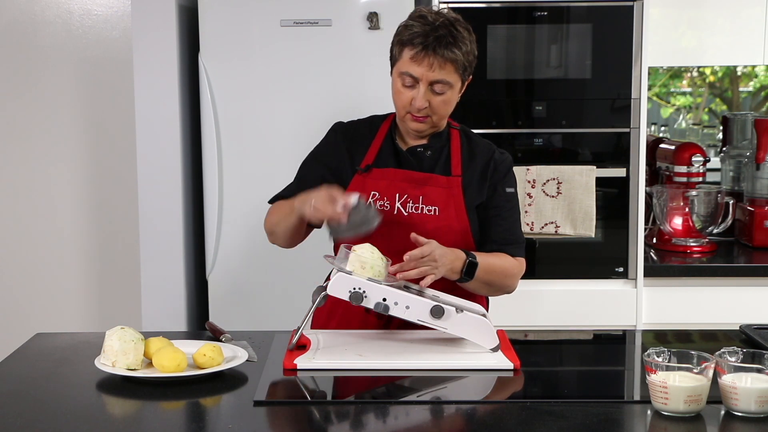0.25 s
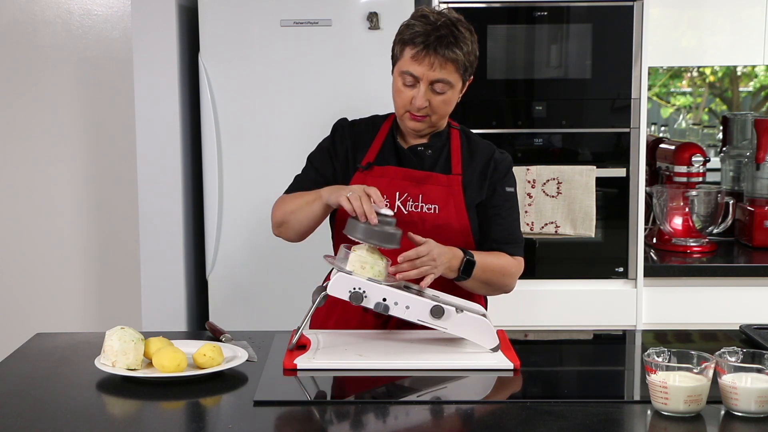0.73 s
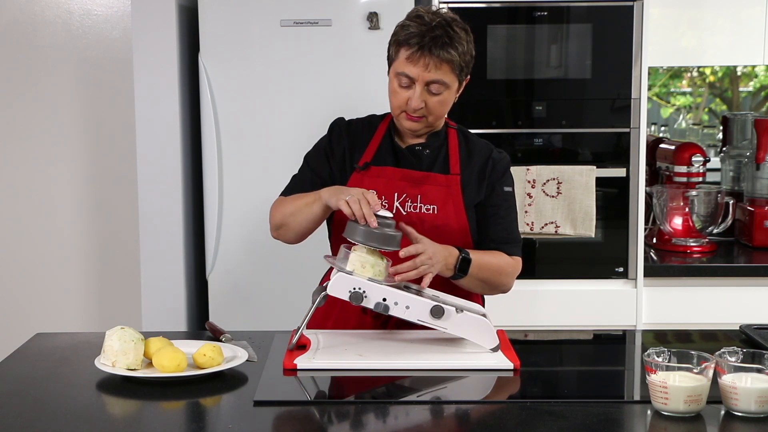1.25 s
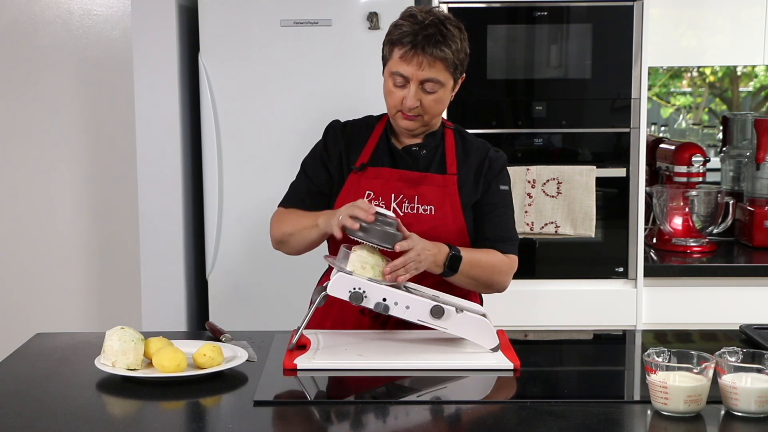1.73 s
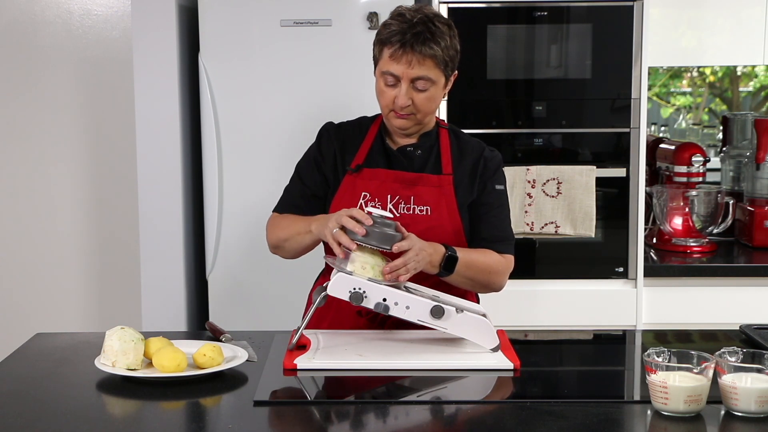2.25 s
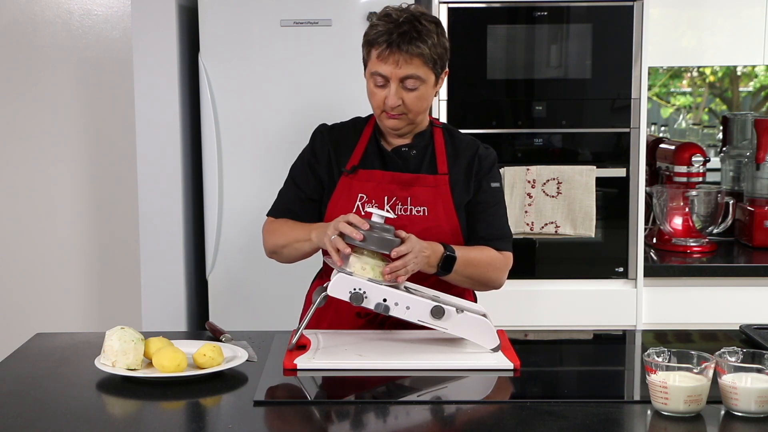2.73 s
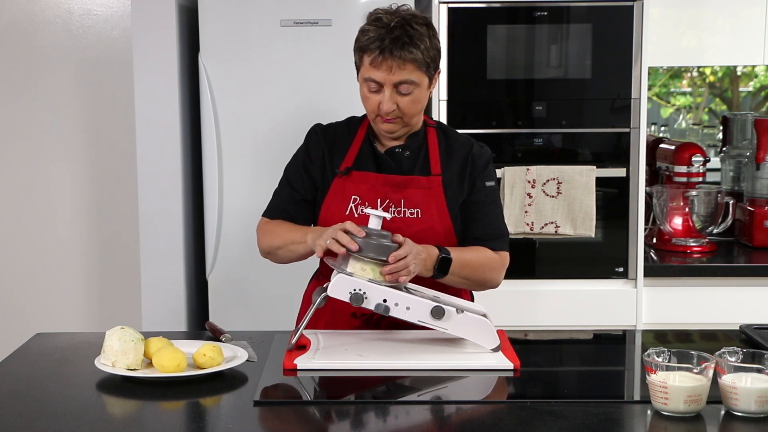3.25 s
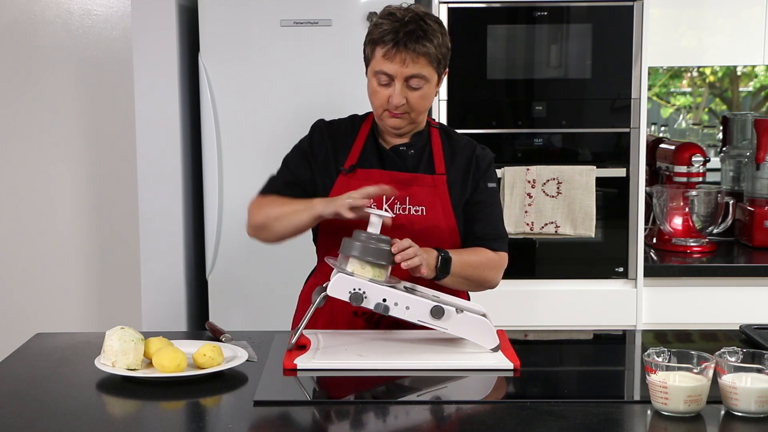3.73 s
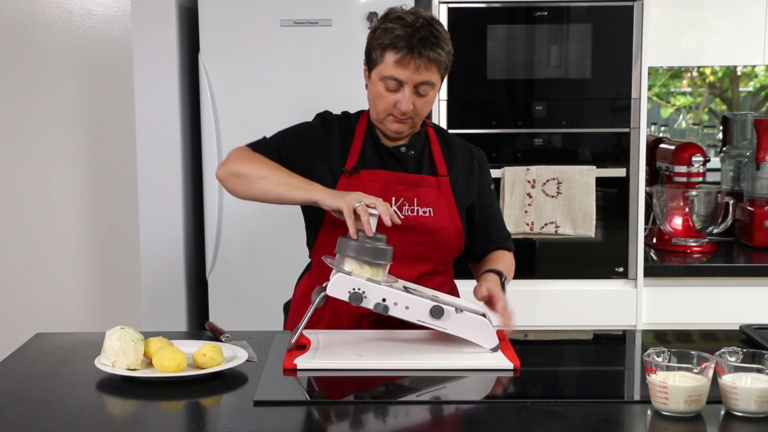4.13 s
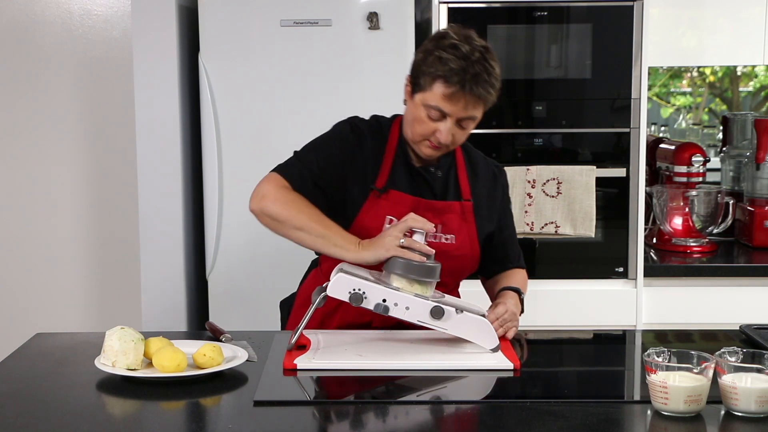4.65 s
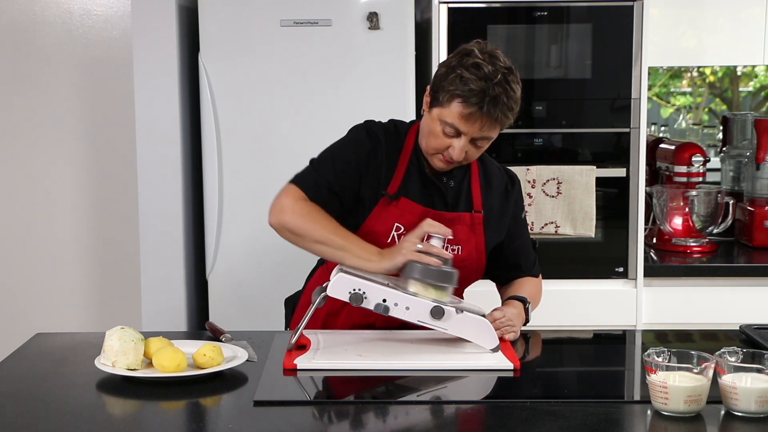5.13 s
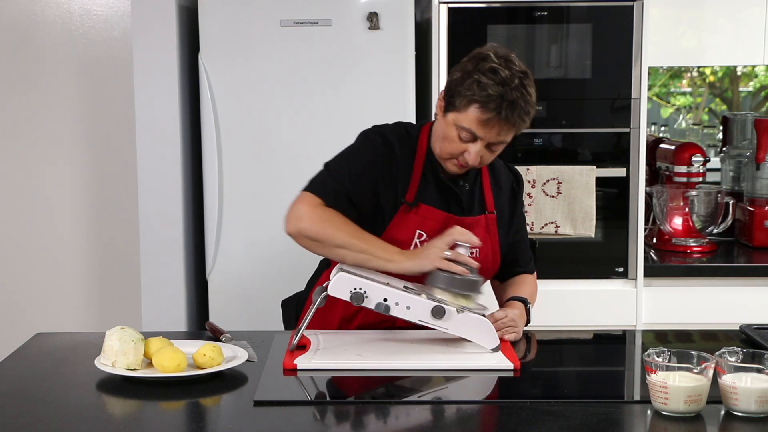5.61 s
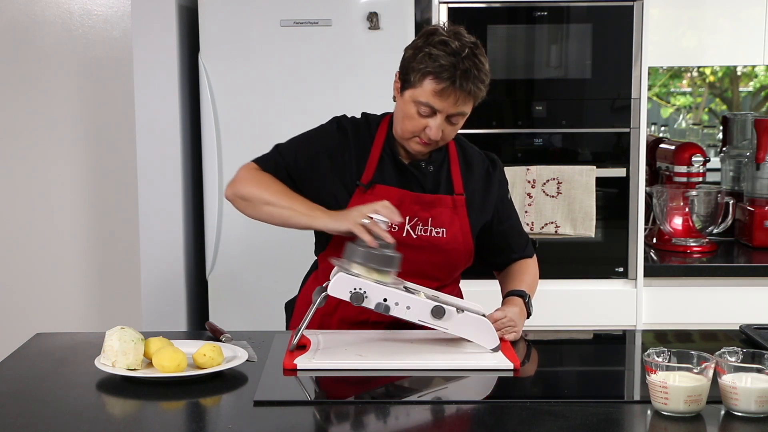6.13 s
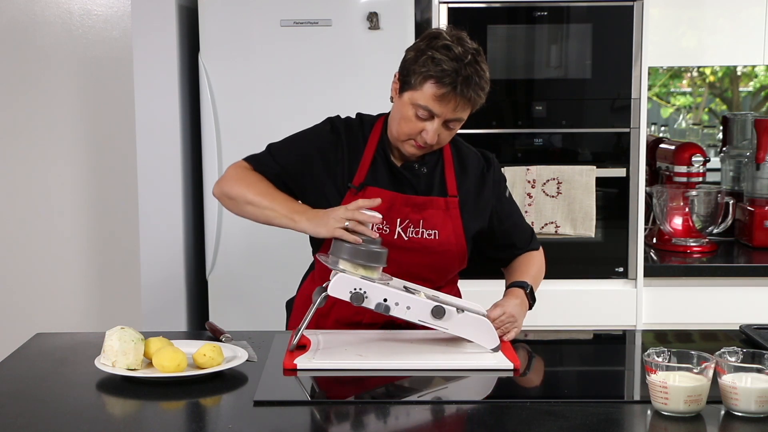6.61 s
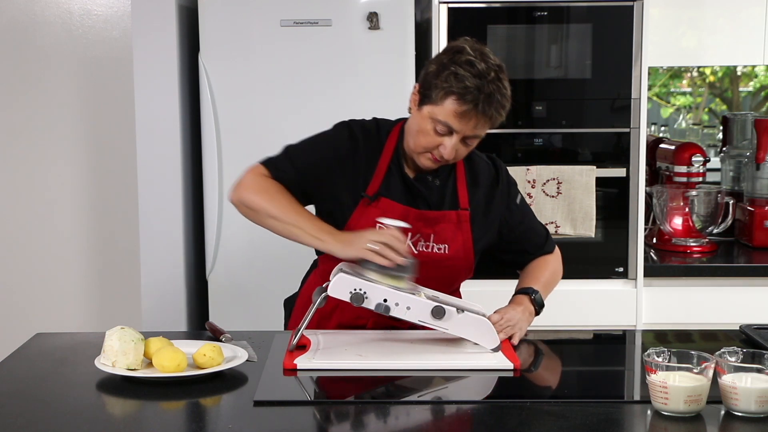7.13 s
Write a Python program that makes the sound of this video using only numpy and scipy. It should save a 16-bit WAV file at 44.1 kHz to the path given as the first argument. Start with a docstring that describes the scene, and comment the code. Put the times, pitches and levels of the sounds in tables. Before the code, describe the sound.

Over the faint air of a hard-walled kitchen, fingers brush and rattle a plastic food holder. Its cap taps lightly onto a root vegetable at 0.5 seconds, and the prongs snap in sharply at 1.7. The loose shell rattles softly from about 2 to 3 seconds, then is pushed home with a loud clack at 3.4. A palm taps the plunger at 3.9.

From 4.5 seconds the holder slides back and forth over a mandoline slicer in uneven strokes, rubbing, ticking and faintly squeaking on the rails while the blade rasps through the vegetable. The strongest stroke starts near 5.2 and ends in a loud crack with low thumps through the worktop. The holder knocks against the slicer's body at 5.8 and 6.9, with rattling between, and another rasping cut comes at about 7.3. Each impact leaves a short room echo.

```python
"""A plastic food holder takes a root vegetable over a mandoline slicer in a hard-walled kitchen.
First the cap taps down on the vegetable, the prongs snap in and the loose shell rattles in the hands.
At 3.4 s the shell is pushed home with a clack, then a palm lands on the plunger. From 4.5 s the holder
slides to and fro, rattling and squeaking on the rails while the blade rasps through the flesh. At 5.3 s
it cracks across the blade, then knocks on the frame. Blows thump the worktop; the room rings on."""
import sys
import numpy as np
from scipy import signal
from scipy.fft import rfft, irfft, next_fast_len
from scipy.io import wavfile
from scipy.ndimage import uniform_filter1d, map_coordinates

SR = 44100
rng = np.random.default_rng(int(sys.argv[2]) if len(sys.argv) > 2 else 0)


def to_wav(s):
    """Save 16-bit WAV."""
    ch = np.atleast_2d(s).T  # columns
    pcm = np.round(np.clip(ch, -1, 1) * 32767)  # PCM
    wavfile.write(sys.argv[1], SR, pcm.astype(np.int16))


N = 325017
TIME = np.arange(N) / SR
SLIDE_START_S, RELEASE_S = 4.52, 0.025  # the sliding begins; decay constant of a stroke


# Cracks at the end of the cut, then the slice drops on the base: (time [s], level [dB], brightness [dB/octave],
# contact t60 [s])
CUT_END_HITS = [(5.317, -13.5, 0, 0.09), (5.3224, -8.5, -0.5, .028), (5.3553, -3.5, 0.5, .032),
                (5.413, -22, -6.5, 0.047)]
# Rocking on the rails: (time [s], level [dB], brightness [dB/octave], length [s], swell [dB])
RAIL_ROCKING = [(4.085, -30, 0, 0, 0), (4.3366, -32.5, 2, 0.00063, 0), (4.656, -29.5, -2.5, 0, 9),
                (5.56, -30, 0, 0, 0), (5.6035, -17, -1, 0.0011, 0), (5.949, -20, 1, .011, -4.5),
                (6.012, -31, 3.5, .011, 9.5), (6.078, -23.5, 0.5, .014, 1.5), (6.18, -30, -2, 0.0004, 4),
                (6.229, -35.5, -1, 0, 2), (6.268, -31, -3, 0.00033, 0), (6.463, -45.5, 0, 0.00036, 0),
                (6.5027, -27, 1.5, 0.00026, 0), (6.5255, -31.5, -1, .0105, -0.5),
                (6.633, -31.5, -2, .043, 2.5), (7.074, -27, 0.5, .024, 6), (7.251, -20, 0.5, .007, 3.5)]
# Ring of the rails: (pitch [Hz], width [Hz], level [dB])
RAIL_RING = [(685, 480, 1.5), (1340, 40, -2), (1610, 73, 2), (2014, 78, 2), (2600, 103, 2.5),
             (3400, 63, -3), (4280, 120, -5.5), (4990, 83, -11), (8040, 330, -33)]
# Their body tone: (frequency [Hz], level [dB])
RAIL_EQ = [(60, -25.5), (130, 5), (280, 4.5), (480, -10.5), (900, 0), (1500, -1.5), (3000, 4), (4800, 4),
           (7000, -2.5), (10500, -10.5), (16000, -27.5)]

def rails(rub):
    """The holder ticks and rattles along the rails and cracks across the blade."""
    touch_t60 = 0.044
    ticks = [(s, db, rng.normal(0, 2), touch_t60 / 2)
             for s, db in slide_moments(rub, count=26, over_db=-1.5, spread_db=2.5)]
    hits = CUT_END_HITS + rattles(RAIL_ROCKING, touch_t60) + ticks
    return amp(-2) * contacts(hits, RAIL_RING, RAIL_EQ, ring_db=9, wet_db=-9, place_db=2)


# Pushes and pulls: (time at full speed [s], rise [s], hold [s], rub [dB], rasp [dB])
CUTTING_STROKES = [(4.592, 0.068, 0.084, -44, -47), (4.819, 0.026, 0.04, -44, -46.5),
                   (5.157, 0.0028, 0.26, -32.5, -39), (5.92, 0.023, .02, -35, -47),
                   (6.022, 0.014, 0.05, -37.5, -50), (6.203, 0.066, 0.099, -46.5, -55),
                   (6.635, .03, 0.024, -45, -64), (7.253, 0.078, 0.062, -36, -38)]

def friction():
    """Envelopes of the ramp's rub and the blade's rasp: strokes over the drag of a leaning hand."""
    light_drag = (SLIDE_START_S, RELEASE_S, 1.838, -54.5, -64.5)  # one long, quiet stroke
    power = np.zeros((2, N))
    for s, rise, hold, rub_db, rasp_db in CUTTING_STROKES + [light_drag]:
        speed = np.exp(-np.maximum(s - TIME, 0) / rise - np.maximum(TIME - s - hold, 0) / RELEASE_S)
        power += (amp([[rub_db], [rasp_db]]) * speed) ** 2
    return np.sqrt(power)


# Dull rub on the ramp: (frequency [Hz], level [dB])
RUB_EQ = [(60, -15.5), (120, 0), (400, 0), (620, 3.5), (780, 7.5), (1050, -4), (1500, -2), (2200, 0.5),
          (3200, -9), (4500, -13.5), (7000, -36.5)]
# Bright rasp at the blade: (frequency [Hz], level [dB])
RASP_EQ = [(1760, -19), (3000, -0.5), (3330, -2.5), (4030, -5.5), (5440, -4), (7940, -8.5), (9870, -13),
           (16000, -23)]

def slicing(rub, rasp):
    """The flesh rubs on the ramp and its cells burst at the blade, in uneven slips."""
    grip = stick_slip(per_s=310, spread_db=1, relax_s=0.0023)
    ramp = rub * coloured(grains(per_s=2000, spread_db=3.5, smooth=0.81), RUB_EQ)
    blade = rasp * coloured(grains(per_s=2200, spread_db=4, smooth=0.8), RASP_EQ)
    return kitchen(grip * (ramp + blade), wet_db=-7.5)[:N]


# Knocks on the frame: (time [s], level [dB], brightness [dB/octave], contact t60 [s])
FRAME_HITS = [(5.749, -25, -6, 0.12), (5.7535, -21, -1, 0.057), (5.8128, -20.5, -4.5, 0.025),
              (6.840, -37.5, -3.5, 0.2), (6.851, -23.5, -2.5, 0.075), (6.8555, -23.5, -5, 0.087),
              (6.8618, -12.5, -3.5, 0.028), (6.878, -23.5, -4, 0.051), (7.358, -31, -12, 0.028),
              (7.365, -27.5, -6.5, 0.084)]
# Ring of the frame: (pitch [Hz], width [Hz], level [dB])
FRAME_RING = [(687, 20.5, 0), (767, 31, 1), (940, 47, -0.5), (1300, 79, -4.5), (1610, 190, -4),
              (1900, 110, -4), (2140, 113, -1.5), (3310, 30, -2.5), (4080, 59, -1), (5020, 95, -8.5),
              (5800, 220, -4), (7500, 150, -18)]
# Its body tone: (frequency [Hz], level [dB])
FRAME_EQ = [(60, -33), (200, -33), (560, -14), (730, -11), (1100, -6), (2300, -15), (4100, -9.5),
            (6200, -13.5), (10000, -14.5), (16000, -30.5)]

def frame():
    """The holder runs into the slicer's frame and sets it ringing."""
    return amp(5) * contacts(FRAME_HITS, FRAME_RING, FRAME_EQ, ring_db=1, wet_db=-11.5)


# Rattles in the hands: (time [s], level [dB], brightness [dB/octave], length [s], swell [dB])
SHELL_SHAKES = [(0.041, -37.5, -4, 0.017, 4), (.915, -52.5, -3.5, 0.0028, 2), (1.532, -55, -3, 0.023, 3),
                (2.118, -42.5, -0.5, 0.00044, 0), (2.561, -42.5, 1, 0.015, 3.5),
                (2.8305, -50.5, 2, 0.0011, 2), (2.8653, -50, 0.5, 0, 0), (3.039, -31.5, -1, 0.031, 0),
                (3.2075, -42, 0.5, 0, 0), (3.6545, -48, 6, 0.0048, -1)]
# The clack home: (time [s], level [dB], brightness [dB/octave], contact t60 [s])
SEATING_HITS = [(3.3535, -26, -1, 0.2), (3.3668, -16, -5, 0.018), (3.3708, -7, 1.5, 0.025),
                (3.374, -8, 1, 0.017)]
# Ring of the shell, loose and seated: (pitch [Hz], width [Hz], level [dB])
LOOSE_RING = [(352, 79, -12.5), (780, 66, 2), (930, 95, -6), (1900, 210, -2), (3200, 200, -11.5)]
SEATED_RING = [(452, 52, -9), (694, 28, -7), (758, 37, 0.5), (1296, 70, -4.5), (1413, 47, 5), (2010, 83, 0),
               (2200, 36, -1), (3390, 61, -9.5), (3730, 83, -18), (4030, 150, -12), (4850, 160, -10.5),
               (5920, 200, -13.5)]
# Its body tone: (frequency [Hz], level [dB])
SHELL_EQ = [(50, -40.5), (130, -20.5), (330, -15.5), (700, -8), (2200, -11), (2700, -19.5), (6500, -19.5),
            (10000, -24.5), (16000, -47.5)]

def shell():
    """The holder's plastic shell rattles loosely and clacks as it is pushed home."""
    touches = rattles(SHELL_SHAKES, touch_t60=0.083)
    loose = contacts(touches, LOOSE_RING, SHELL_EQ, ring_db=2, wet_db=-6)
    seated = contacts(SEATING_HITS, SEATED_RING, SHELL_EQ, ring_db=3.5, wet_db=-9)
    return amp(1.5) * loose + seated


# A soft snap, then a hard one: (time [s], level [dB], brightness [dB/octave], contact t60 [s])
PRONG_HITS = [(.5435, -39, 0, 0.043), (1.7402, -13, 0.5, 0.024)]
# Ring of the prongs: (pitch [Hz], width [Hz], level [dB])
PRONG_RING = [(753, 25, 0.5), (1138, 54, 1), (1494, 26, -1), (1598, 36, 2.5), (1760, 33, -3.5),
              (3060, 69, -4), (3750, 90, 2), (3830, 20, 3), (4260, 30, -8), (5600, 88, -10),
              (6200, 370, -13.5), (7260, 114, -13), (9210, 140, -15.5)]
# Their body tone: (frequency [Hz], level [dB])
PRONG_EQ = [(100, -28), (300, -16.5), (620, -20.5), (760, 1.5), (1200, -2), (1350, -14), (2900, -4.5),
            (4200, -16), (4900, -25), (6600, -8.5), (10000, -27), (16000, -52.5)]

def prongs():
    """The prongs ring as they snap into the vegetable."""
    return contacts(PRONG_HITS, PRONG_RING, PRONG_EQ, ring_db=7.5, wet_db=-7)


# Pitched pocks: (time [s], level [dB], pitch [Hz])
POCK_NOTES = [(2.1, -43.5, 2200), (2.574, -43, 896), (3.005, -42.5, 930), (4.249, -37, 1900),
              (4.478, -38, 2200), (5.161, -16, 2130), (5.189, -18, 2080), (5.708, -26, 2600),
              (6.306, -35.5, 2100), (6.861, -17.5, 5800)]
# Partials of a plastic wall: (pitch [ratio to the note], level [dB])
WALL_PARTIALS = [(.43, -12.5), (.88, -4), (0.999, 0), (1.17, -5.5), (1.36, -14)]

def pocks(rub):
    """Taps and tiny stick-slip squeaks ring a plastic wall: one note, its neighbours dying fast."""
    track, t = np.zeros(N), np.arange(SR // 5) / SR
    squeak_hz, spread_octaves = 2492, 0.45
    squeaks = [(s, db, squeak_hz * 2 ** rng.normal(0, spread_octaves))
               for s, db in slide_moments(rub, count=130, over_db=2.5, spread_db=1.5)]
    attack = 1 - np.exp(-t / 0.00036)
    for s, db, hz in POCK_NOTES + squeaks:
        t60 = max(0.086 * (1000 / hz) ** 2, 0.015)  # higher notes are shorter
        drift = np.cumsum(rng.standard_normal(len(t))) * 2.5 / np.sqrt(SR * t60)
        note = np.zeros(len(t))
        for ratio, level in WALL_PARTIALS:
            life = t60 if level == 0 else min(t60, 0.025)
            note += amp(level - 60 * t / life) * np.sin(2 * np.pi * hz * ratio * t + drift)
        add(track, s, amp(db + 5.5) * note * attack)
    return kitchen(track, wet_db=-11)[:N]


# Palm tap: (time [s], level [dB], brightness [dB/octave], contact t60 [s])
PLUNGER_HITS = [(3.8645, -27, 0, 0.045)]
# Ring of the plunger: (pitch [Hz], width [Hz], level [dB])
PLUNGER_RING = [(720, 74, -1), (1016, 24, 8), (1380, 59, 1.5), (3200, 44, -4.5), (4270, 70, -3.5)]

def plunger():
    """The palm lands on the plunger, which rings over the shell's body tone."""
    return contacts(PLUNGER_HITS, PLUNGER_RING, SHELL_EQ, ring_db=4, wet_db=-6.5)


# Light double tap: (time [s], level [dB], brightness [dB/octave], contact t60 [s])
CAP_HITS = [(.537, -43.5, -4, 0.046), (0.5428, -31, 1, 0.03)]
# Ring of the cap: (pitch [Hz], width [Hz], level [dB])
CAP_RING = [(910, 14, 3), (2385, 25, 5.5), (2950, 49, -4.5), (3740, 98, -2.5), (5470, 52, -13),
            (8190, 140, -18), (9150, 62, -17)]
# Its body tone: (frequency [Hz], level [dB])
CAP_EQ = [(100, -19), (700, -16.5), (4000, -12), (8000, -44), (16000, -41)]

def cap():
    """The holder's cap clicks as it lands on the vegetable."""
    return contacts(CAP_HITS, CAP_RING, CAP_EQ, ring_db=1.5, wet_db=-11)


# Heavy blows: (time [s], level [dB])
WORKTOP_BLOWS = [(3.364, -43.5), (5.355, -39), (5.416, -36), (5.762, -43), (6.857, -51)]
# Boom of the worktop: (pitch [Hz], level [dB], t60 [s])
WORKTOP_RING = [(49, -4, 0.18), (66.8, 0, 0.37), (101, -2.5, 0.19), (133, -1, 0.18)]

def worktop():
    """Blows, touches and shoves pass through the slicer's feet into the worktop's low modes."""
    track, t = np.zeros(N), np.arange(SR // 2) / SR
    landing_s = CAP_HITS[0][0]  # touches only carry once the holder is down
    touches = [(s, -39.5 + 0.49 * db) for s, db, *_ in CAP_HITS + SHELL_SHAKES if s >= landing_s]
    shoves = [(s, rub_db - 12) for s, _, _, rub_db, _ in CUTTING_STROKES]
    attack = 1 - np.exp(-t / 0.012)
    for s, db in WORKTOP_BLOWS + touches + shoves:
        for hz, level, t60 in WORKTOP_RING:
            phase = 2 * np.pi * hz * rng.normal(1, 0.03) * t + rng.uniform(0, 2 * np.pi)
            mode = amp(level - 60 * t / t60) * np.sin(phase)
            add(track, s, amp(db + 9.5) * mode * attack)
    return track


# Soft swells: (time [s], half length [s], level [dB])
BRUSH_SWELLS = [(0.02, 0.13, -57.5), (0.227, 0.036, -53.5), (0.46, 0.13, -58), (2.323, 0.052, -66.5),
                (2.58, 0.17, -61), (3.838, 0.1, -59.5), (3.993, 0.1, -54), (4.237, 0.24, -53)]

def brushing():
    """Fingers and flesh brush the holder while the hands adjust their grip."""
    pressure = sum(amp(db) * np.exp(-((TIME - s) / half) ** 2) for s, half, db in BRUSH_SWELLS)
    skin_eq = [(200, 1.5), (800, 3), (2000, -5.5), (6000, -11), (15000, -24)]
    texture = coloured(grains(per_s=1500, spread_db=0, smooth=0.62), skin_eq)
    return kitchen(pressure * texture, wet_db=-9.5)[:N]


# Narrow peaks of the holder's walls: (frequency [Hz], level [dB])
TWIST_EQ = [(700, -25), (1350, -7), (1530, 4), (1750, -15), (2010, -7), (2150, -18), (2310, -8),
            (2700, -26), (8000, -45)]

def twisting():
    """A faint rub sings in the holder's walls as it is worked into the flesh."""
    swell = amp(-66.5) * np.exp(-((TIME - 1.04) / 0.11) ** 2)
    return swell * coloured(grains(per_s=600, spread_db=-1, smooth=0.78), TWIST_EQ)


# Reverb decay: (frequency [Hz], t60 [s])
KITCHEN_DECAY = [(200, 0.92), (530, 0.74), (1400, 0.7), (3700, 0.58), (9700, 0.53), (15000, 0.55)]

def kitchen(x, wet_db, dull_hz=8000, build_s=0.0026):
    """x and its diffuse echo off hard walls, which builds quickly and loses its treble first."""
    hz, t, bands = signal.stft(rng.standard_normal(SR * 3 // 4), SR, nperseg=256)
    decay = amp(-60 * t / along(KITCHEN_DECAY, hz)[:, None])
    build = 1 - np.exp(-(t / build_s) ** 2)
    tail = signal.istft(bands * decay * build, SR, nperseg=256)[1]
    tail = signal.lfilter(*signal.butter(1, dull_hz, fs=SR), tail / np.linalg.norm(tail))
    return np.pad(x, (0, len(tail) - 1)) + amp(wet_db) * signal.fftconvolve(x, tail)


# Room tone: (frequency [Hz], level [dB])
AIR_EQ = [(15, -90), (25, -11), (123, -7.5), (153, 0), (200, 3.5), (591, -9.5), (677, -15), (796, -6.5),
          (988, -14), (1130, -22.5), (1290, -20), (1940, -18.5), (2760, -24.5), (4870, -23.5),
          (16000, -35.5)]

def room_tone():
    """The kitchen's quiet air: a steady bed of dark noise."""
    return amp(-59.5) * coloured(rng.standard_normal(N), AIR_EQ)


def contacts(hits, modes, eq, ring_db, wet_db, place_db=1, size=8192):
    """Each contact is a short chatter of surfaces that rings one part and then the room."""
    track, t = np.zeros(N), np.arange(size) / SR
    hz = np.fft.rfftfreq(size, 1 / SR) + 1
    rings = np.array([amp(db + ring_db) ** 2 / (1 + ((hz ** 2 - f ** 2) / (hz * width)) ** 2)
                      for f, width, db in modes])
    octaves = np.log2(np.clip(hz, 300, 12000) / 2000)
    for s, db, brightness, t60 in hits:
        reach = amp(place_db * rng.standard_normal(len(modes)))  # each spot favours other modes
        body = np.sqrt(reach ** 2 @ rings + amp(along(eq, hz)) ** 2)
        fade = amp(-60 * t / t60)
        chatter = rfft(rng.standard_normal(size) * fade)
        force = irfft(chatter / np.abs(chatter)) * np.sqrt(fade)  # a hard hit has a flat spectrum
        hit = irfft(rfft(force) * minimum_phase(body * amp(brightness * octaves)))
        loudest = np.sqrt(uniform_filter1d(hit ** 2, size=128).max())
        add(track, s, kitchen(hit * amp(db) / loudest, wet_db))
    return track


def rattles(rows, touch_t60, rock_s=0.018):
    """A loose part touches about every rock_s, growing or fading; the shortest rattles touch once."""
    touches = []
    for s, db, brightness, length, swell_db in rows:
        count = max(round(length / rock_s), int(length > rock_s / 4)) + 1
        for u in np.linspace(0, 1, count):
            touches.append((s + u * length, db + u * swell_db, brightness, touch_t60))
    return touches


def slide_moments(rub, count, over_db, spread_db):
    """Random cues during the sliding, riding the rub's level: (time [s], level [dB])."""
    progress = (np.arange(count) + rng.random(count)) / count
    times = SLIDE_START_S + progress * (TIME[-1] - SLIDE_START_S)
    rub_db = 20 * np.log10(np.interp(times, TIME, rub) + 1e-6)
    return zip(times, rub_db + rng.normal(over_db, spread_db, count))


def stick_slip(per_s, spread_db, relax_s):
    """Friction jumps at uneven moments and relaxes to a steady grip."""
    jumps = (rng.random(N) < per_s / SR) * amp(spread_db * rng.standard_normal(N))
    relaxing = signal.lfilter([1], [1, -np.exp(-1 / (relax_s * SR))], jumps)
    return unit(1 + unit(relaxing))


def grains(per_s, spread_db, smooth):
    """Tiny fractures of uneven size over a share of smooth sliding noise."""
    cracks = (rng.random(N) < per_s / SR) * rng.standard_normal(N)
    cracks *= amp(spread_db * rng.standard_normal(N))
    return unit(cracks) + smooth * rng.standard_normal(N)


def amp(db):
    """Decibels to gain."""
    return 10 ** (np.asarray(db) / 20)


def unit(x):
    """Scale to rms 1."""
    return x / np.sqrt(np.mean(x ** 2) + 1e-20)


def along(points, hz):
    """Read a curve of (frequency [Hz], value) on a log axis."""
    f, v = np.transpose(points)
    return np.interp(np.log(hz + 1), np.log(f), v)


def filtered(x, gain):
    """x through a gain that depends on frequency."""
    size = next_fast_len(N + SR // 2)
    return irfft(rfft(x, size) * gain(np.fft.rfftfreq(size, 1 / SR)), size)[:N]


def coloured(x, eq):
    """x through an EQ curve, at rms 1."""
    return unit(filtered(x, lambda hz: amp(along(eq, hz))))


def minimum_phase(gain):
    """The response with this gain and the tightest attack."""
    cepstrum = irfft(np.log(np.maximum(gain, 1e-6)))
    half = len(cepstrum) // 2
    return np.exp(rfft(np.r_[cepstrum[0], 2 * cepstrum[1:half], np.zeros(half)]))


def add(track, s, sound):
    """Mix a sound into a track at time s."""
    part = track[max(round(s * SR), 0):][:len(sound)]
    part += sound[:len(part)]


def scene():
    """The mono mix: holder, slicer, hands and worktop over the room tone."""
    air = room_tone()
    rub, rasp = friction()
    holder = cap() + prongs() + shell() + plunger()
    slicer = rails(rub) + frame() + pocks(rub) + slicing(rub, rasp)
    return (holder + slicer + brushing() + twisting() + worktop() + air)[None]


def record(dry):
    """Master chain: thin the deepest bass, clip at full scale, cut the very top steeply."""
    low_cut_hz, top_hz = 38, 15900
    thinned = signal.lfilter(*signal.butter(2, low_cut_hz, "high", fs=SR), dry[0])
    return filtered(np.clip(thinned, -1, 1), lambda hz: 1 / np.sqrt(1 + (hz / top_hz) ** 200))[None]


dry = scene()
out = record(dry)
to_wav(out)
```